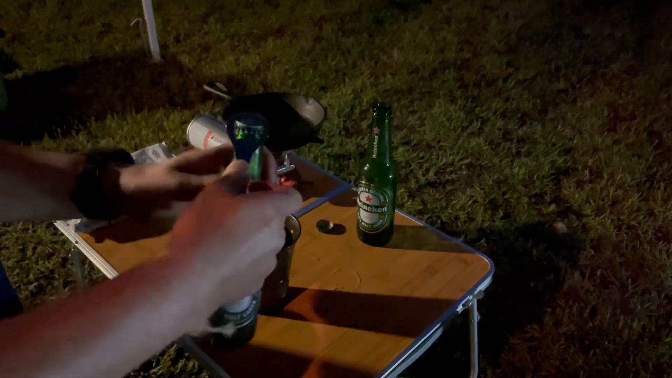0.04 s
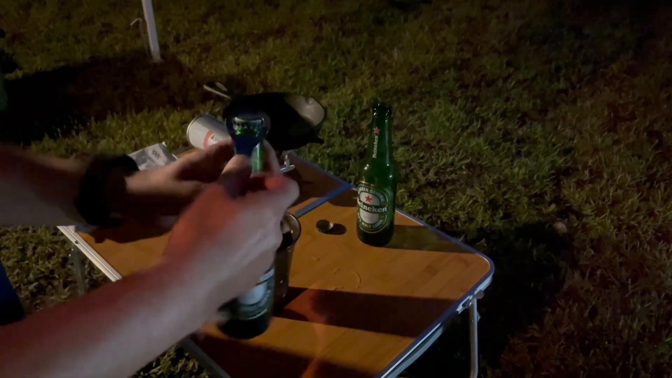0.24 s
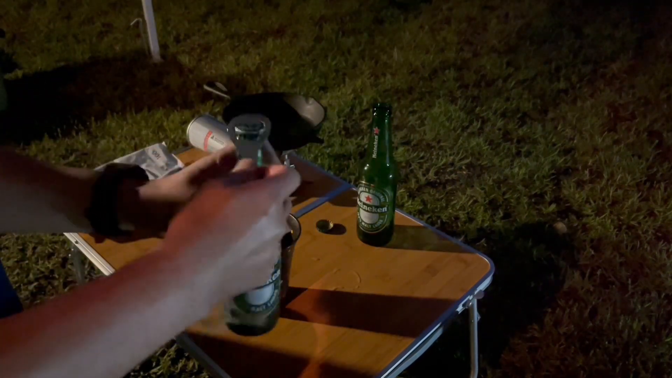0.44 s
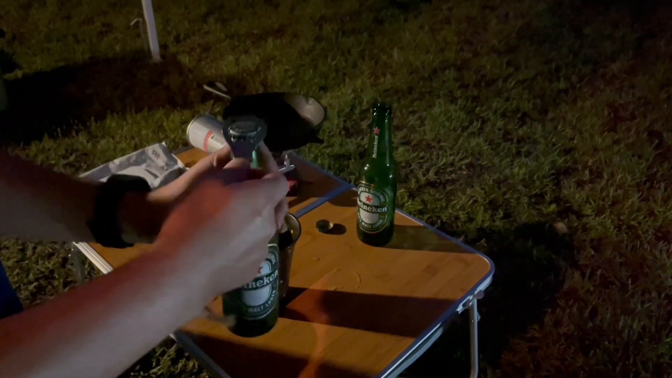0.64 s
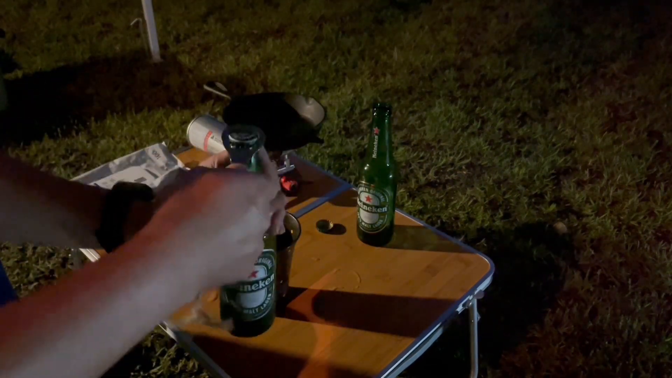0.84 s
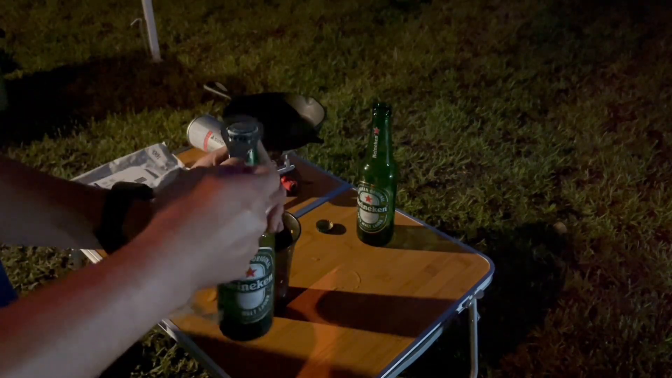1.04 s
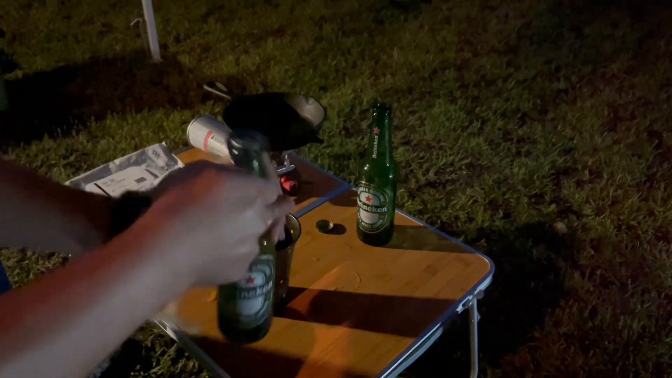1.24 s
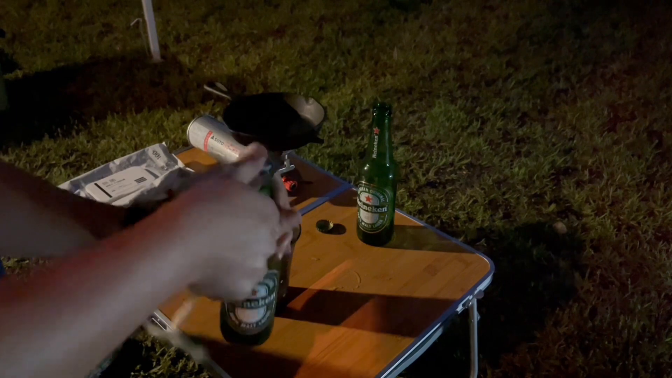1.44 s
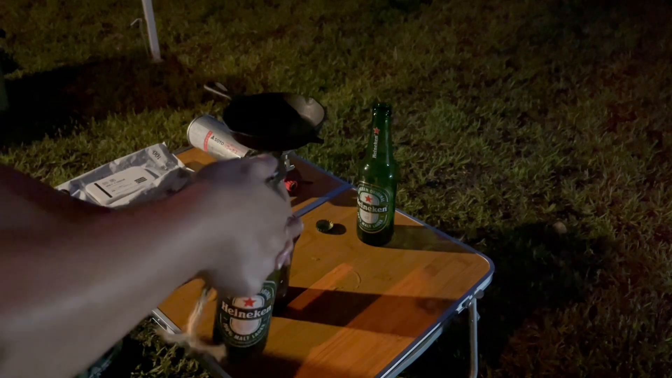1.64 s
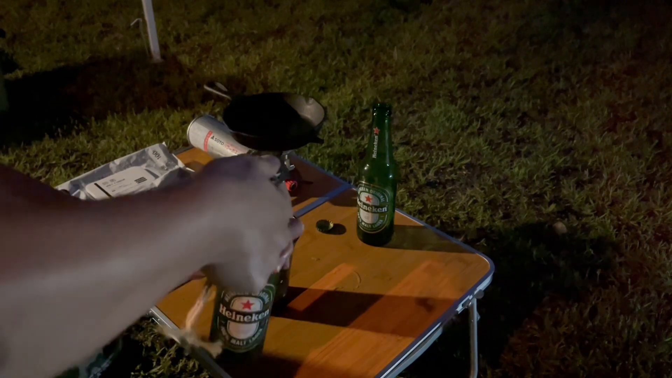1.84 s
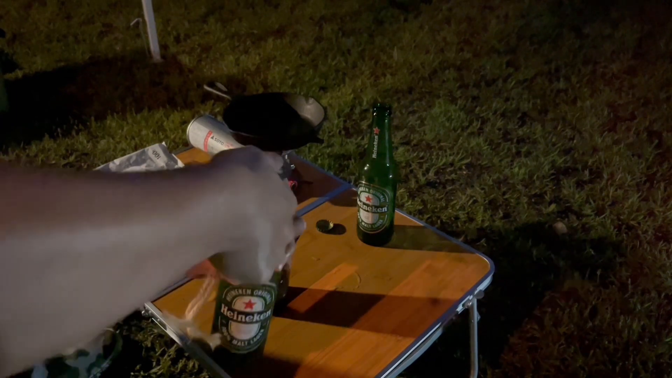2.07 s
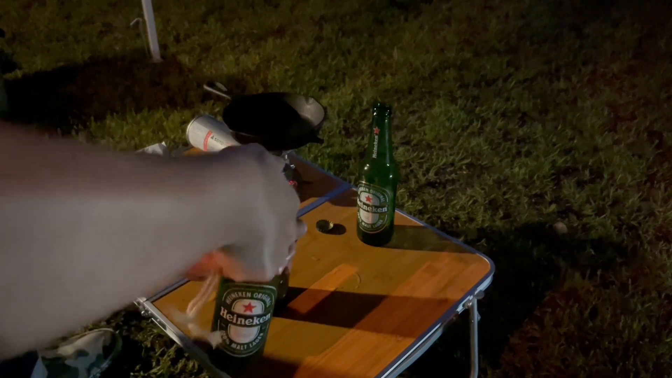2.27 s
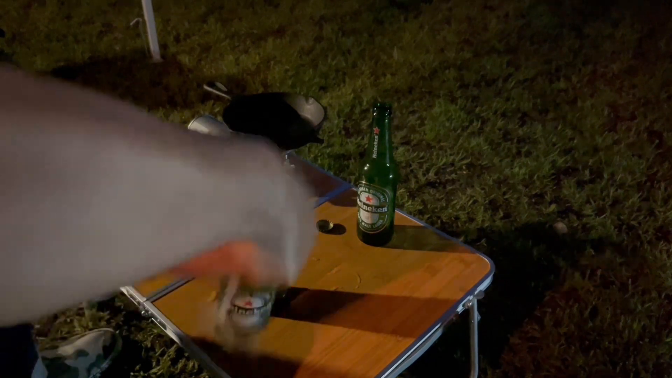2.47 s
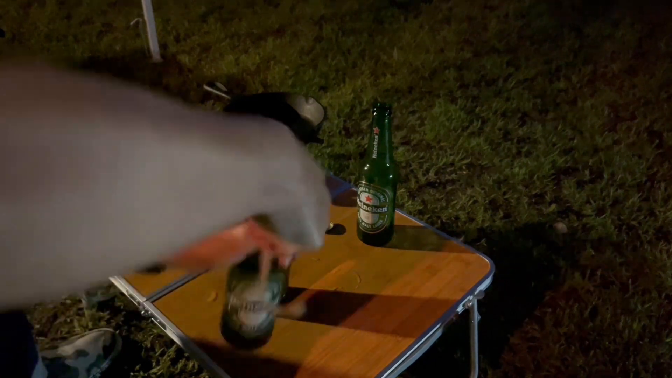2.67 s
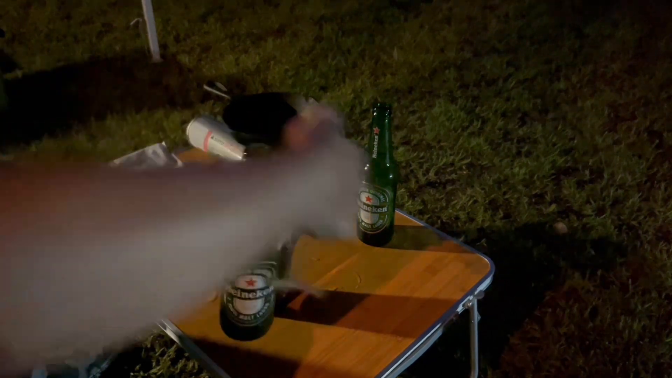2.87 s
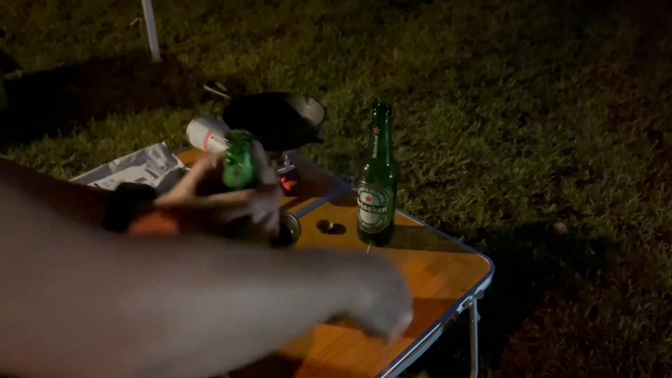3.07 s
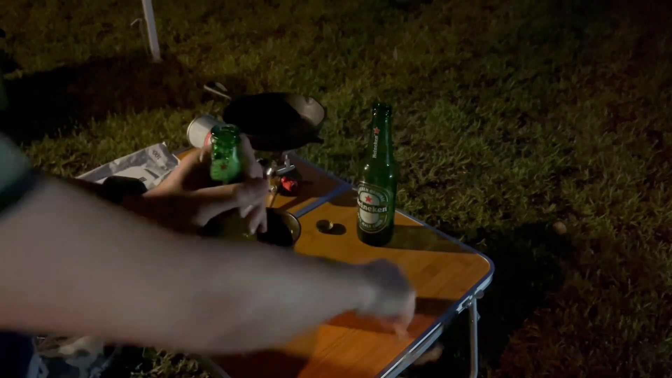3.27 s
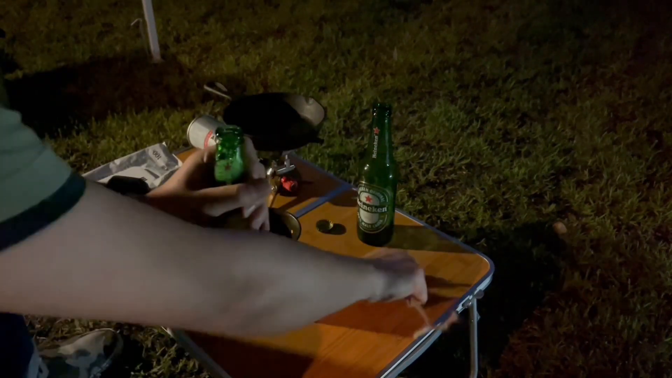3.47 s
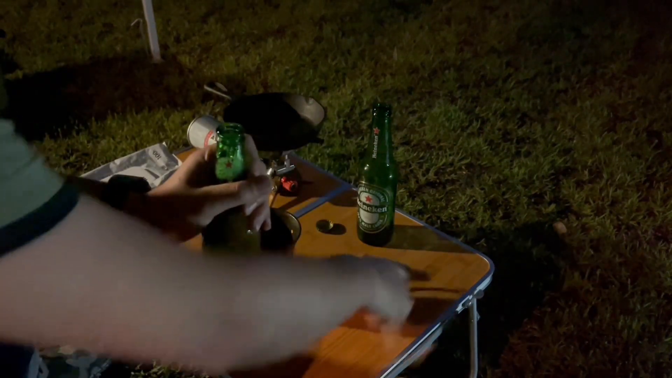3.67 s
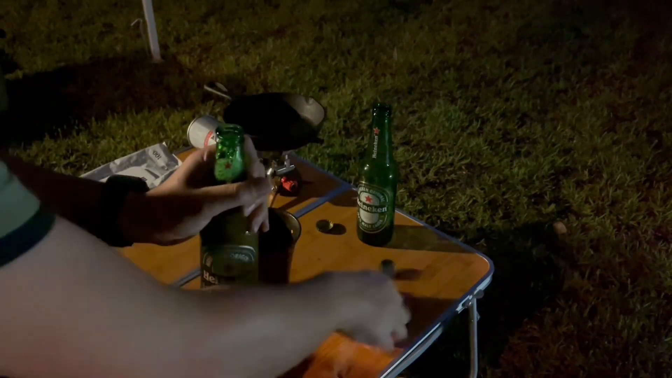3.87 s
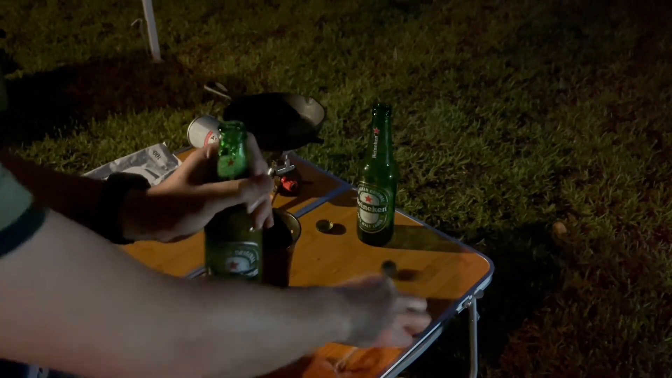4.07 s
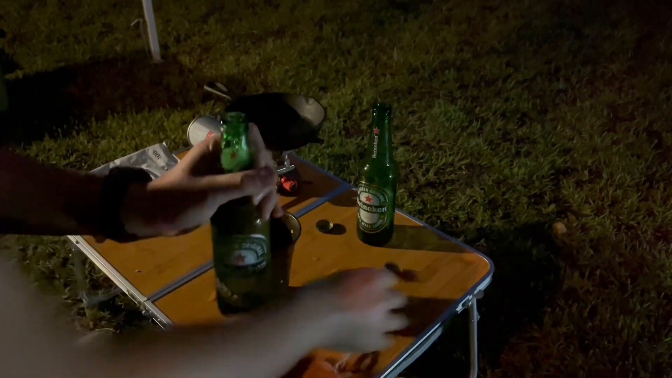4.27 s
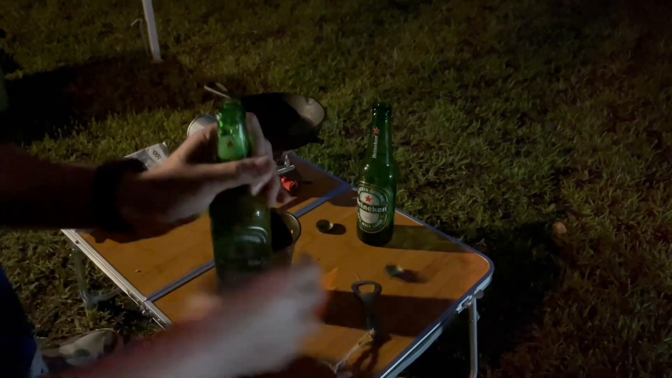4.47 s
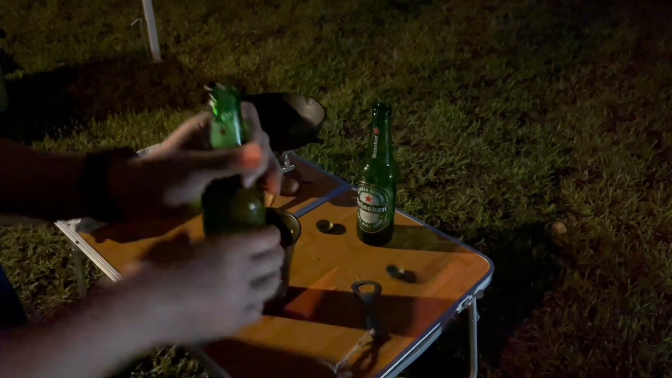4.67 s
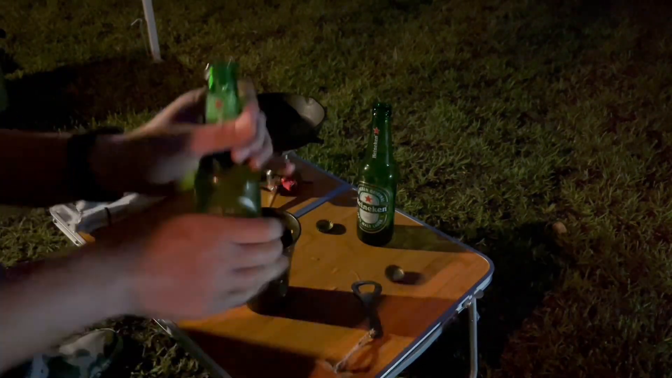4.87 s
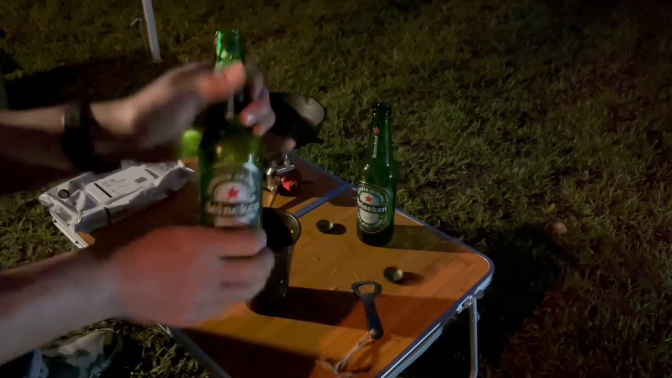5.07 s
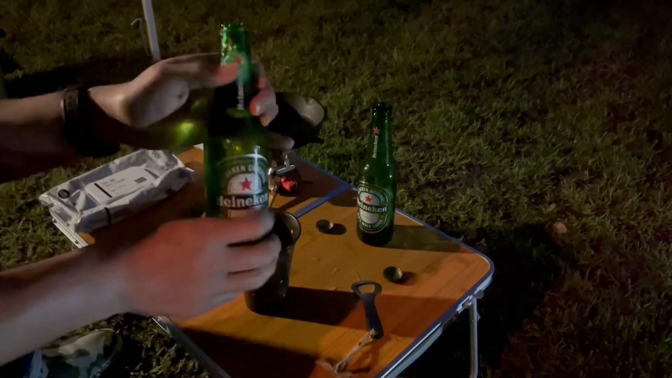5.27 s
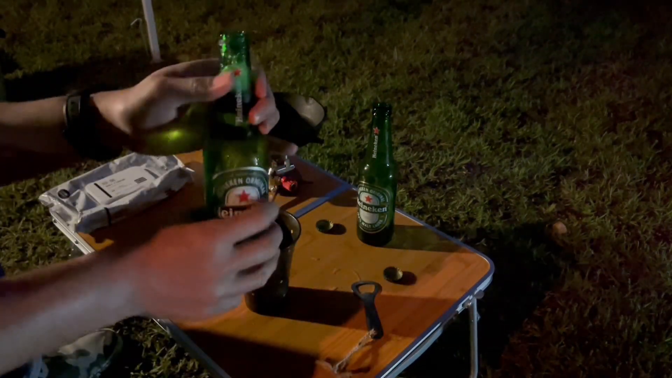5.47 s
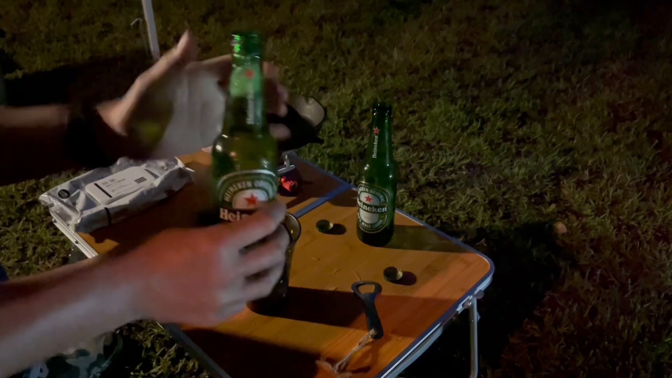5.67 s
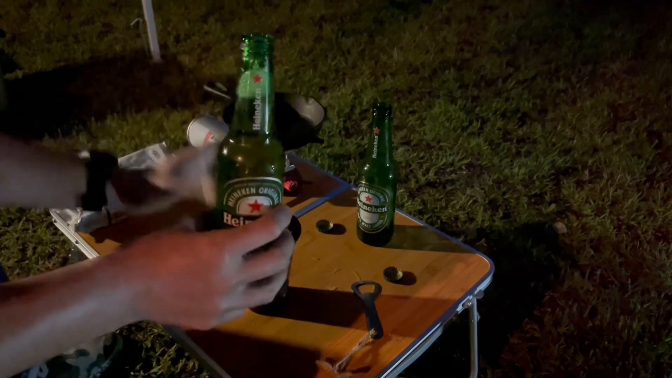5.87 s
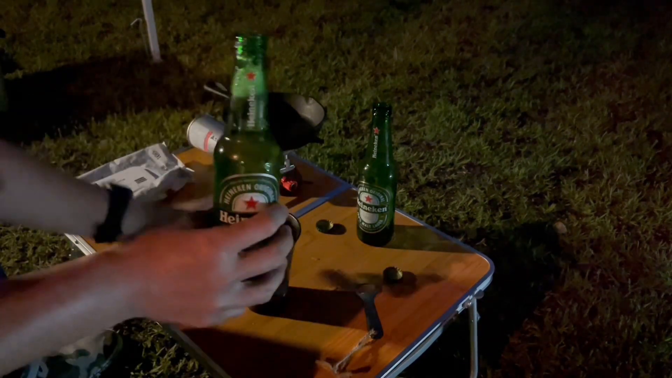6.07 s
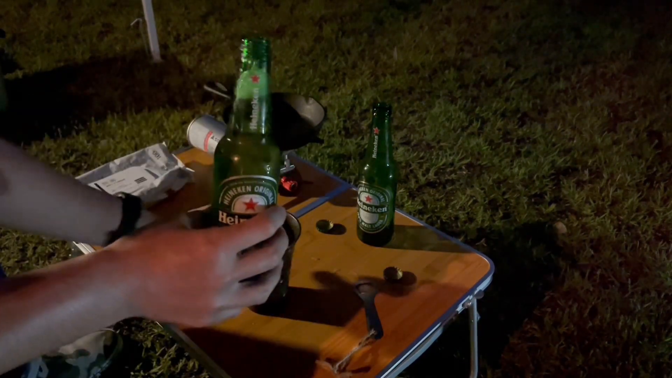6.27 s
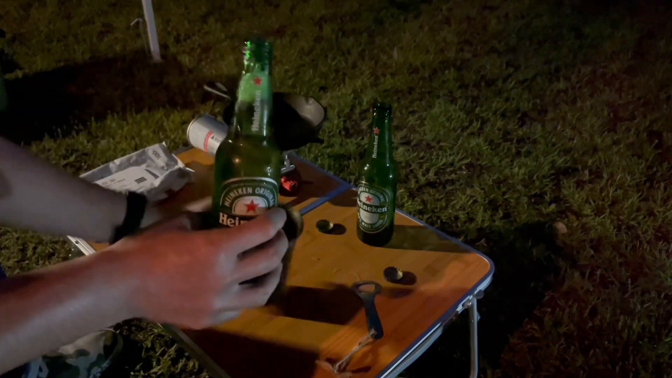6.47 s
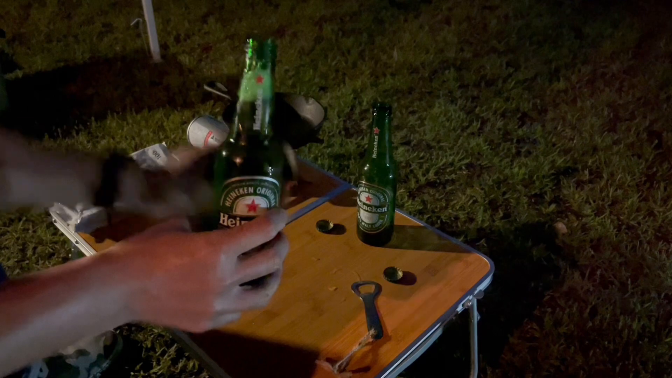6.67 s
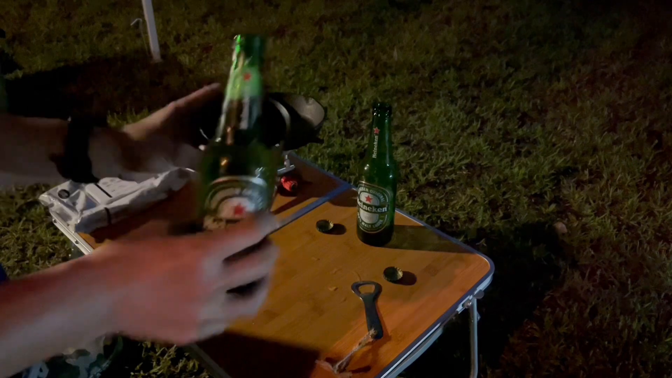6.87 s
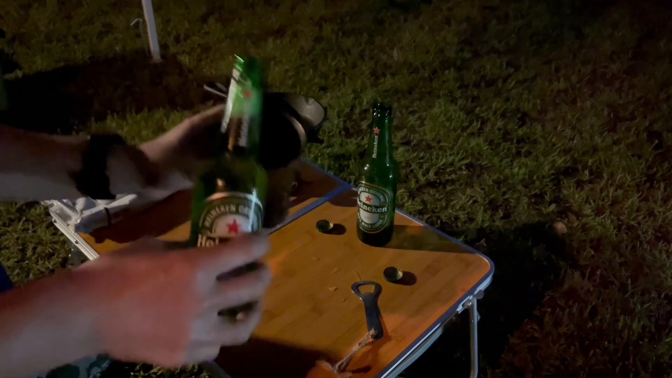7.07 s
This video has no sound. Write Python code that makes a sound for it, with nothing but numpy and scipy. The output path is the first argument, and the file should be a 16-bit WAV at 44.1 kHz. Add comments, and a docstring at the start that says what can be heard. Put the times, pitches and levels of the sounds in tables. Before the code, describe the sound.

A quiet lawn at night, heard by two close microphones: a thin insect chorus, a nearer fluttering high buzz and soft low distant traffic throughout. At 0.27 s a steel opener ticks brightly on a glass bottle, with fainter touches until 1.3. At about 1.57 a short, high, fluttering gas hiss swells and dies by 1.75. At 2.36 the crimped cap cracks loose with a loud sharp snap, followed by smaller clicks to 2.67. From 3.36 to 3.55 the cap bounces on a thin wooden table, ringing tinnily, then rolls on its rim. The opener lands hard at 3.84 and clatters again from 3.99 to 4.1 with a thin steel ring. The cap keeps whirring, ever faster, with light rim slaps, until it stops abruptly near 5.47. Around 6.3 to 6.4 a dull, soft cluster of knocks bumps the table; then only insects and traffic remain until the end.

```python
"""A lawn on a summer night: a steel opener ticks on a glass bottle, gas hisses out, the cap cracks off.
Cap and opener drop on a thin folding table, the cap spins down on its crimped rim, the table takes a bump.
Noise-burst contacts drive resonances; random taps make the roll; shaped noise makes gas and far traffic.
Insects buzz all round: a noise chorus and a tone swept by wing strokes. Two close microphone ports listen."""
import sys
import numpy as np
from scipy import signal
from scipy.fft import rfft, irfft, next_fast_len
from scipy.io import wavfile
from scipy.ndimage import uniform_filter1d, map_coordinates

SR = 44100
rng = np.random.default_rng(int(sys.argv[2]) if len(sys.argv) > 2 else 0)


def store_wav(level_fs):
    """Save 16-bit WAV to argv[1]."""
    pcm = np.round(np.clip(np.atleast_2d(level_fs), -1, 1) * 32767)
    wavfile.write(sys.argv[1], SR, pcm.T.astype(np.int16))


N = 314433
T = np.arange(N) / SR
M = next_fast_len(N + 8192)
F = np.fft.rfftfreq(M, 1 / SR)
HALF = np.array([[.5], [-.5]])  # left, right

# Treble colour of a hard contact. Each row: frequency in Hz, relative level in dB.
CRACK_COLOUR = [(500, -45), (1500, 1.5), (2500, 7.5), (5000, 1.5), (8000, 6), (10000, 17), (12500, -7),
                (13500, -42.5), (16000, -37)]
# Modes of the loose cap. Each row: frequency in Hz, width in Hz, relative level in dB.
CAP_MODES = [(2370, 82, -11), (2900, 210, -2.5), (3403, 150, -11), (3834, 110, -0.5), (5750, 130, -8),
             (10145, 160, 1), (11400, 380, -9)]


def amp(db):
    """Amplitude ratio of a level in dB."""
    return 10 ** (np.asarray(db) / 20)


def unit(x):
    """x scaled to an RMS of 1."""
    return x / np.sqrt(np.mean(x ** 2) + 1e-20)


def along(points, hz):
    """(Hz, value) points interpolated on a log frequency axis."""
    f, v = np.transpose(points)
    return np.interp(np.log(hz + 1), np.log(f + 1), v)


def curves(rows):
    """One dB value per sample for each column after the time, silent outside the rows."""
    s, *cols = np.transpose(rows)
    return [np.interp(T, s, c, left=-140, right=-140) for c in cols]


def wobble(rate):
    """A smooth random curve, rate knots a second."""
    return map_coordinates(rng.standard_normal(int(N * rate / SR) + 4), [T * rate])


def filtered(x, response):
    """x times a complex response given on the grid F."""
    return irfft(rfft(x, M) * response, M)[..., :N]


def colour(spectrum):
    """Zero-phase response through (Hz, dB) points."""
    return amp(along(spectrum, F))


def coloured(x, spectrum):
    """x filtered through (Hz, dB) points."""
    return filtered(x, colour(spectrum))


def band(hz, q):
    """A causal resonance."""
    damping = 1j * F * hz / q
    return damping / (hz * hz - F * F + damping)


def body(modes):
    """Causal sum of resonances, alternating in sign."""
    return sum((-1) ** k * amp(db) * band(hz, hz / width) for k, (hz, width, db) in enumerate(modes))


def placed(x, left, pan_db, spread):
    """A near source at two ports: left earlier and louder, plus scattered sound that differs between them."""
    # Phase lead of the left port, scaled by left. Each row: frequency in Hz, lead in radians.
    lead = [(1200, 0.42), (2200, 1), (3100, 0.97), (4200, 1), (5500, 0.69), (8000, 0)]
    scatter = rfft(rng.standard_normal(400) * amp(-60 * T[:400] / 0.023), M)
    scatter = scatter / np.sqrt(np.mean(abs(scatter) ** 2))
    scatter = scatter / (1 + (F / 8500) ** 8) * F / (F + 2500)
    pan = amp(pan_db * HALF / (1 + (F / 6500) ** 4))
    direct = pan * np.exp(1j * left * HALF * along(lead, F))
    return filtered(x, direct + spread * HALF * scatter)


def contacts(rows, tail_db, tail_s, blow=0, rise_s=.000057, rumble=.79, snap=0):
    """Contact drives: treble and middle noise bursts with rattling tails; bass a clean blow and a tail.

    Rows: start s, treble dB, middle and bass against it dB, contact ms; snap and blow are first samples.
    """
    drive, t = np.zeros((3, N + SR)), np.arange(SR // 8) / SR
    for s, db, mid_db, low_db, ms, *_ in rows:
        tail = amp(tail_db - 60 * t / tail_s)
        hit = amp(-20 * t / (abs(ms) / 1000 + 0.0004))
        burst = (hit + tail) * (1 - np.exp(-t / rise_s))
        shape = np.array([burst, burst, rumble * tail]) * rng.standard_normal((3, len(t)))
        shape[:, 0] = snap, blow, 6
        levels = amp([[db], [db + mid_db], [db + low_db]])
        drive[:, round(s * SR):][:, :len(t)] += levels * shape
    return drive[:, :N]


def notes(rows, note_db, t60, rise_s=0.00033):
    """The short decaying sine of each touched spot; rows start with s and dB and end with Hz."""
    out, t = np.zeros(N), T[:SR // 16]
    for s, db, *_, hz in rows:
        envelope = amp(db + note_db - 60 * t / t60) * (1 - np.exp(-t / rise_s))
        out[round(s * SR):][:len(t)] += envelope * np.sin(2 * np.pi * hz * t)
    return out


def insect_buzz(wing):
    """One nearer insect: each wing stroke swells and falls in pitch, mixed with gated noise."""
    stroke = np.cumsum(87 * (1 + 0.012 * wobble(2.6))) / SR % 1
    teeth = np.sin(2 * np.pi * np.cumsum(8300 - 800 * stroke + 60 * wobble(40)) / SR)
    gate = 0.568 + np.sin(np.pi * stroke) ** 2
    noise = unit(coloured(rng.standard_normal(N), wing))
    return unit(coloured(gate * (0.79 * teeth + 0.79 * noise), wing))


def night():
    """Far traffic and a smooth insect chorus, both partly alike at the ports, and the wing buzz."""
    # Each row: time in s, traffic level in dB, buzz level in dB.
    night_levels = [(0, -68.5, -65.5), (.5, -66, -64.5), (1, -68.5, -66), (1.8, -68.5, -63.5),
                    (2.5, -64.5, -67), (2.8, -74.5, -64), (3.3, -74, -63.5), (3.6, -67.5, -65),
                    (4.8, -74, -61), (5.3, -62.5, -66), (6, -69.5, -65.5), (7.2, -66, -60.5)]
    # Far traffic. Each row: frequency in Hz, relative density in dB.
    traffic = [(18, -39), (32, -11), (85, -0.5), (129, -5.5), (182, -8.5), (369, -20.5), (438, -21.5),
               (776, -18.5), (1350, -33), (1900, -47.5), (2600, -89)]
    # Far insects. Each row: frequency in Hz, relative level in dB.
    chorus = [(1700, -37.5), (2000, -20.5), (2450, 0.5), (2900, -17.5), (3700, -1), (4600, -5),
              (5400, -8.5), (6000, -6), (6700, -12), (9000, -7.5), (10500, -6.5), (11500, -19),
              (13000, -67)]
    # Wing buzz. Each row: frequency in Hz, relative level in dB.
    wing = [(6600, -17.5), (7200, -6), (7700, -2.5), (8200, -4), (8700, -5.5), (9400, -29.5)]
    # Likeness of the ports. Each row: frequency in Hz, correlation (clipped to -1..1).
    alike = [(60, 0.96), (290, 0.83), (640, -0.15), (1400, -0.51), (3000, 0.081), (6000, 0.047),
             (8000, -1.3), (10000, 0.9)]
    traffic_db, buzz_db = curves(night_levels)
    turn = np.arccos(np.clip(along(alike, F), -1, 1)) / 2
    layers = ((traffic, traffic_db + 0.5 * wobble(3.9), 2.2),
              (chorus, -66.5 + 0.75 * wobble(27), 1.2))
    out = 0
    for spectrum, db, pan_db in layers:
        shares = colour(spectrum) * [np.cos(turn), np.sin(turn)]
        mid, side = filtered(rng.standard_normal((2, N)), shares)
        ports = np.array([mid + side, mid - side]) * amp(pan_db * HALF)
        out = out + amp(db) * unit(ports)
    near = placed(insect_buzz(wing), left=1.0, pan_db=0.5, spread=0.077)
    far = unit(coloured(rng.standard_normal((2, N)), wing))
    return out + amp(buzz_db) * (near + 0.5 * far)


def table_top():
    """Modes of the thin top, which radiates little deep bass."""
    # Each row: frequency in Hz, width in Hz, relative level in dB.
    top_modes = [(212.2, 21, 8.5), (260.3, 41, 2), (327, 53, 2), (503, 30, 0), (563.2, 23, -2.5),
                 (711, 57, -1.5), (877, 23, -2), (1091, 50, -4.5), (1180, 71.9, -7), (1303, 55, 1),
                 (1477, 77, -2.5), (1946, 110, -5.5), (2330, 260, -14.5)]
    return body(top_modes) / (1 + (150 / (F + 1)) ** 4)


def struck_wood(top):
    """Middle and bass responses of the struck top: modes plus a dry thud that returns from the edges."""
    bend_ms = 2.3  # bending waves: lag at 200 Hz, less a constant 0.51 ms; the bass arrives later
    thud_db, edge_ms, edge_share = -6, 4.5, 0.32  # thud against modes; round trip; share kept
    bend = np.exp(-4j * np.pi * bend_ms / 1000 * np.sqrt(200 * F) * (1 - np.sqrt(F / 16000)))
    thud = amp(thud_db) / (1 - edge_share * np.exp(-2j * np.pi * F * edge_ms / 1000))
    middle = amp(5.5) * bend * (top + thud) * band(1300, q=0.71) / (1 + (F / 6000) ** 4)
    bass = amp(27.5) * bend * (top + thud * band(660, q=1.0)) * band(190, q=0.33)
    return [middle, bass * (1j * F / (90 + 1j * F)) ** 2]


def bump(top):
    """Soft knocks under the top: slow-rising contacts drive middle and bass only."""
    # Each row: start in s, level in dB, middle against it in dB, note in Hz.
    knocks = [(6.3, -41.5, -12, 282), (6.322, -32, -18, 298), (6.332, -31, -7, 465),
              (6.337, -40.5, 0.5, 520), (6.347, -36.5, -12, 250), (6.369, -36, -18, 198),
              (6.389, -45, -18, 195), (6.409, -54.5, -28, 158), (6.419, -54.5, -32, 120)]
    rows = [(s, db, mid_db, 0, 6) for s, db, mid_db, _ in knocks]
    drive = contacts(rows, tail_db=-5.5, tail_s=0.058, rise_s=0.0035, rumble=0.33)[1:]
    middle = amp(15.5) * band(840, q=1.0) ** 2 / (1 + (F / 3000) ** 4)
    bass = amp(19) * top * band(225, q=0.27) ** 3 * band(350, q=0.17) / (1 + (F / 700) ** 4)
    out = filtered(drive, [middle, bass]).sum(axis=0)
    return out + notes(knocks, note_db=4, t60=0.039, rise_s=0.00237)


def opener_lands(wood):
    """The opener's bounces drive the top and its steel modes; rocking to rest, it sings high and thin."""
    # Each row: start in s, crack level in dB, middle and bass against crack in dB, note in Hz.
    opener_drops = [(3.8374, -11, 3, -7, 2260), (3.8497, -31.5, -8.5, 4.5, 1250),
                    (3.991, -18, 1.5, -6, 1076), (4.0158, -26, 9.5, -15.5, 1360),
                    (4.0292, -34.5, -1.5, -20.5, 2430), (4.0326, -12.5, -3, -3.5, 1230),
                    (4.0581, -21, -10, -12.5, 3200), (4.0656, -17.5, 2.5, -11, 1310),
                    (4.0773, -22, -3.5, -6.5, 1020), (4.0928, -30.5, -6.5, -3, 1460)]
    # Each row: frequency in Hz, width in Hz, relative level in dB.
    steel = [(3270, 35, -3.5), (5550, 110, -4.5), (8600, 140, -10)]
    contact_ms, sing_s = 5.2, 4.02
    rows = [(*row[:-1], contact_ms) for row in opener_drops]
    drive = contacts(rows, tail_db=-9.5, tail_s=0.091, blow=3.3, rumble=0.27)
    crack = amp(-11) * colour(CRACK_COLOUR) + amp(2.5) * body(steel)
    out = filtered(drive, [crack, *wood]).sum(axis=0)
    out += filtered(drive[0] * (T > sing_s), amp(8.5) * band(12410, q=260))
    return out + notes(opener_drops, note_db=2.0, t60=0.015)


def cap_lands(wood):
    """The drops drive the top and the cap's high modes; the cap rings in flight between bounces."""
    # Each row: start in s, crack level in dB, middle and bass against crack in dB, note in Hz,
    # note level in dB, drive of the ring in flight in dB before a gain of 3.
    drops = [(3.3629, -26.5, -40, -44, 9740, -13.5, -22), (3.4141, -17.5, -9, -2, 2910, -24, -36),
             (3.495, -16.5, -31, -6, 3020, -27, -32), (3.5339, -11, -5, -24, 10050, -11, -19),
             (3.547, -31.5, -6, -2, 5550, -33, -25), (3.552, -26, 1, -8.5, 2320, -32.5, -35)]
    # Airborne cap. Each row: frequency in Hz, width in Hz, relative level in dB.
    airborne = [(2236, 16, 0), (5560, 81, -0.5), (8533, 62, -6), (9690, 60, 5), (10000, 71, -9)]
    contact_ms = 4.4
    rows = [(*row[:-3], contact_ms) for row in drops]
    drive = contacts(rows, tail_db=-17, tail_s=0.14, blow=3.3, rumble=0.52, snap=2.1)
    # a hard landing favours the high modes
    bright = body(CAP_MODES) * F / 4000 / (1 + (F / 11300) ** 12)
    crack = amp(-12.0) * colour(CRACK_COLOUR) + amp(6.5) * bright
    out = filtered(drive, [crack, *wood]).sum(axis=0)
    rows = [(s, db, 0, 0, contact_ms) for s, *_, db in drops]
    flight = contacts(rows, tail_db=-11.5, tail_s=0.16, rise_s=0.00081)[0]
    # the cap's ring in flight, made three times stronger
    out += 3 * filtered(flight, body(airborne))
    pitches = [(s, db, hz) for s, *_, hz, db, _ in drops]
    return out + notes(pitches, note_db=5.0, t60=0.0185, rise_s=0.0003)


def rim_slaps(wood):
    """The sinking rim slaps the top; lying almost flat, it rings only in its low modes."""
    # Each row: start in s, crack level in dB.
    slaps = [(4.227, -42.5), (4.332, -34.5), (4.427, -35), (4.686, -39), (4.735, -31.5), (4.826, -38),
             (4.901, -29.5), (4.979, -37.5), (5.052, -42), (5.158, -33), (5.203, -47), (5.2541, -32),
             (5.3063, -34), (5.355, -49), (5.3986, -30.5), (5.421, -33.5), (5.4361, -30.5), (5.45, -30)]
    mid_db, bass_db, contact_ms = 5.5, -19.5, 1.34  # levels against the crack
    rows = [(s, db, mid_db, bass_db, contact_ms) for s, db in slaps]
    drive = contacts(rows, tail_db=-23.5, tail_s=0.033, blow=4.9, rise_s=0.00077)
    crack = amp(-5) * colour(CRACK_COLOUR) / (1 + (F / 10500) ** 12)
    ring = amp(19.5) * body(CAP_MODES[:4]) / (1 + (F / 5000) ** 6)
    return filtered(drive, [crack + ring, *wood]).sum(axis=0)


def table(top):
    """All contacts on the table: cap, rim, opener and the bump from below."""
    wood = struck_wood(top)
    return cap_lands(wood) + rim_slaps(wood) + opener_lands(wood) + bump(top)


def spin(top):
    """The crimped rim rolls ever faster: dense small taps shake the top, sparser ones ring the cap."""
    # Each row: time in s, roll level in dB, the cap's ring against it in dB.
    spin_levels = [(3.54, -32.5, -26), (3.57, -49, -15), (3.87, -45, -19), (3.915, -44.5, -19.5),
                   (3.97, -43, -16.5), (4.24, -47.5, -9.5), (4.75, -47.5, -6), (5.26, -48.5, -19),
                   (5.32, -49, -27), (5.455, -50, -30), (5.48, -69, -34.5), (5.56, -88, -41)]
    # Colour of the roll. Each row: frequency in Hz, relative level in dB.
    roll = [(100, -48.5), (200, -12), (700, -1), (1500, -4.5), (2400, -3), (4200, -7), (6500, -20),
            (9000, -8.5), (11500, -15.5), (12500, -73.5)]
    turns_last_s, rest_s, speedup, turn_start = 26.557, 5.6802, .4727, 0.57
    dig_db, dig_db_per_s, dig_turns, narrows_per_s = 2.5, 1.9, 0.4, 0.077  # depth, growth, width, narrowing
    flicker_db, flicker_late_turns = 6.5, 0.022  # the ring flickers twice a turn
    glide_hz, glide_hz_per_turn, glide_width_hz, glide_db = 2468, 597, 160, 6  # pitch at the dig, climb

    chance = np.array([[7000], [2500]]) / SR
    strength = rng.standard_normal((2, N)) * amp(3.1 * rng.standard_normal((2, N)))
    taps = (rng.random((2, N)) < chance) * strength

    # once a turn the rim digs in
    turns = turn_start - turns_last_s * np.clip(rest_s - T, 0, None) ** speedup
    rolling_s = T - spin_levels[0][0]
    width = dig_turns - narrows_per_s * rolling_s
    dig = (dig_db + dig_db_per_s * rolling_s) * np.exp(-((turns - np.round(turns)) / width) ** 2)

    cap_share = 2.75 * body(CAP_MODES) / (1 + (F / 4500) ** 4)
    wood = filtered(taps[0], colour(roll) * (0.5 + 3.6 * top + cap_share))
    hz, s, z = signal.stft(wood, SR, nperseg=256)
    # the contact wanders over the top, so each mode swells in its own time
    field = uniform_filter1d(rng.standard_normal(z.shape), size=2, axis=0)
    field = uniform_filter1d(field, size=14, axis=1)
    # slow bass modes smooth the turns
    depth = np.clip(hz / 1100, .3, 1.5)[:, None] * np.interp(s, T, dig)
    # a resonance climbs through each turn
    centre_hz = glide_hz + glide_hz_per_turn * ((np.interp(s, T, turns) - .2) % 1 - .8)
    glide = glide_db * np.exp(-((hz[:, None] - centre_hz) / glide_width_hz) ** 2)
    z = z * amp(2.04 * unit(field) + depth + glide)
    wood = unit(signal.istft(z, nperseg=256)[1][:N])

    flicker = flicker_db * np.cos(4 * np.pi * (turns - flicker_late_turns))
    # mostly the cap's thinnest mode
    thin = (band(5570, q=100.6) + 0.02 * band(5570, q=2.2) ** 2) / (1 + (F / 9500) ** 10)
    ring = unit(filtered(taps[1] * amp(4.26 * wobble(30) + flicker), thin))
    level_db, ring_db = curves(spin_levels)
    return amp(level_db + 1.1 * wobble(48)) * (wood + amp(ring_db) * ring)


def ticks():
    """The opener ticks on cap and neck: a crack, duller when soft, a note, and the ring of the glass."""
    # Each row: start in s, crack level in dB, middle against crack in dB, note in Hz.
    tick_rows = [(0.143, -53, -17, 3560), (0.2655, -18.5, -21, 3200), (0.341, -48.5, -15, 2070),
                 (0.3632, -52, -19, 2920), (0.5327, -45.5, -27, 2580), (0.6997, -47, -26, 3020),
                 (0.7577, -53, -28, 2570), (1.046, -38, -44, 3150), (1.2557, -55.5, -28, 2420),
                 (3.143, -55.5, -28, 3520), (6.452, -57.5, -27, 2590)]
    # Bottle modes. Each row: frequency in Hz, relative level in dB, time in s to fall 35 dB.
    glass_modes = [(1327, 6, 0.07), (1950, -8.5, 0.27), (2894, -3, 0.02), (3390, 4.5, 0.041),
                   (3720, 1, 0.16), (4160, -10.5, 0.039), (4980, -17, 0.015), (5180, 3, 0.059),
                   (6020, -3.5, 0.04), (6505, 7.5, 0.017), (8400, -8.5, 0.08), (11330, -1, 0.019)]
    contact_ms, ms_per_db = 0.071, 0.5  # at 0 dB; longer per dB of softness
    glass_db, glass_slope = -22, 0.29  # ring drive against crack at 0 dB; falls per dB of softness
    edge_slope, edge_hz = 0.75, 7000  # the top edge falls faster per dB of softness
    rows = [(s, db, mid_db, glass_db + glass_slope * db, contact_ms - ms_per_db * db)
            for s, db, mid_db, _ in tick_rows]
    drive = contacts(rows, tail_db=-28.0, tail_s=0.19)
    edge_rows = [(s, db + edge_slope * db, *rest) for s, db, *rest in rows]
    edge = contacts(edge_rows, tail_db=-20.0, tail_s=0.12)[0]
    low = 1 / (1 + (F / edge_hz) ** 8)
    crack = amp(-2.5) * colour(CRACK_COLOUR) * low / (1 + (1800 / (F + 1)) ** 2)
    ring = amp(40.0) * body([(hz, 1.3 / fall_s, db) for hz, db, fall_s in glass_modes])
    out = filtered(drive, [crack, amp(17) * band(1100, q=0.5) ** 2, ring]).sum(axis=0)
    out += filtered(edge, amp(9.0) * colour(CRACK_COLOUR) * (1 - low))
    return out + notes(tick_rows, note_db=4.5, t60=0.0137)


def gas():
    """Gas escapes under the lifted rim: a fluttering high jet that swells, holds and dies."""
    # Each row: frequency in Hz, relative level in dB.
    jet_colour = [(500, -51), (2000, -26), (5000, -21.5), (8500, -5), (10300, 2.5), (11500, 3.5),
                  (12700, -24), (13400, -66), (15000, -21), (16000, -42.5)]
    start_s, rise_s, hold_s, level_db, fall_db_per_s = 1.565, 0.052, 0.071, -34.5, 398
    jet = unit(coloured(rng.standard_normal(N), jet_colour))
    rise = np.clip((T - start_s) / rise_s, 0, 1) ** 1.24
    fall_db = fall_db_per_s * np.clip(T - start_s - rise_s - hold_s, 0, None)
    return rise * amp(level_db - fall_db + 0.74 * wobble(100)) * jet


def prise():
    """The crimped cap cracks loose in steps; softer cracks are duller."""
    # Each row: start in s, crack level in dB, bass against crack in dB, note in Hz.
    cracks = [(2.3563, -5, -27, 2365), (2.3583, -21.5, -11.5, 5230), (2.366, -32.5, -1, 820),
              (2.372, -42, -10, 980), (2.3845, -35, -45, 5100), (2.393, -19.5, -41, 1754),
              (2.4106, -15, -57, 3310), (2.4901, -20.5, -26.5, 8320), (2.4925, -26.5, -16.5, 1076),
              (2.5537, -46.5, -8.5, 1560), (2.6343, -42, -53, 3300), (2.651, -43, -18, 1390),
              (2.669, -51.5, -11, 3300), (3.124, -46, -47, 5470)]
    # Cap gripped on the neck. Each row: frequency in Hz, width in Hz, relative level in dB.
    crimp = [(2190, 150, -9), (3353, 80, -3), (3810, 440, -7.5), (5080, 125, 5.5), (5480, 100, 3),
             (6430, 350, 2), (7640, 100, -2), (8270, 150, 4.5)]
    contact_ms, mid_db, mid_slope = 4.6, -26, 0.26  # middle against crack at 0 dB; rises per dB of softness
    rows = [(s, db, mid_db - mid_slope * db, low_db, contact_ms) for s, db, low_db, _ in cracks]
    drive = contacts(rows, tail_db=-18.5, tail_s=0.14, snap=5)
    crack = amp(-6.5) * colour(CRACK_COLOUR) / (1 + (F / 11000) ** 4) + amp(0.5) * body(crimp)
    middle = amp(12.5) * band(1670, q=0.36) ** 2
    bass = amp(21.0) * band(800, q=1.2) ** 3
    out = filtered(drive, [crack, middle, bass]).sum(axis=0)
    return out + notes(cracks, note_db=-4.5, t60=0.017)


def scene():
    """Each near source placed at the ports, over the night."""
    top = table_top()
    out = night()
    out += placed(spin(top), left=0.37, pan_db=2.0, spread=1.0)
    out += placed(table(top), left=0.89, pan_db=1.0, spread=1.0)
    out += placed(ticks(), left=1.0, pan_db=6.0, spread=1.0)
    out += placed(gas(), left=0.74, pan_db=4.0, spread=1.0)
    out += placed(prise(), left=2.18, pan_db=2.5, spread=1.0)
    return out


def record(dry):
    """The ports' cavities turn left against right by a full cycle in the treble; peaks round off; band limit."""
    # Each row: frequency in Hz, phase of left against right in radians.
    cavity_turn = [(8300, 0), (9000, -.8), (9650, -2.4), (10250, -3.14), (11000, -3.7), (11700, -5.2),
                   (12400, -6.28)]
    ports = filtered(dry, np.exp(1j * HALF * along(cavity_turn, F)))
    rounded = ports / (1 + abs(ports / .9) ** 6) ** (1 / 6)
    return filtered(rounded, F < 16700)


dry = scene()
out = record(dry)
store_wav(out)
```